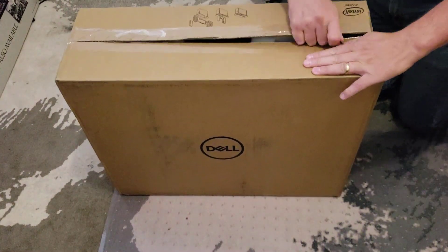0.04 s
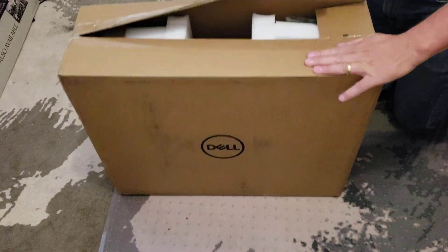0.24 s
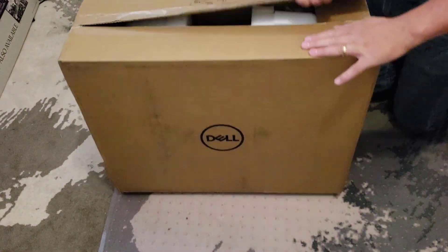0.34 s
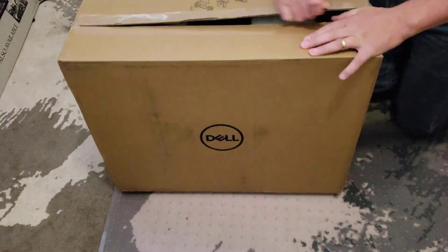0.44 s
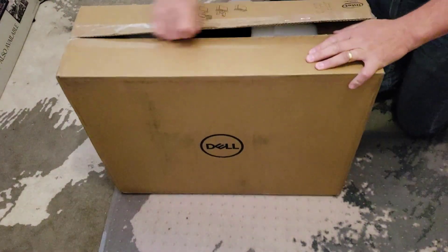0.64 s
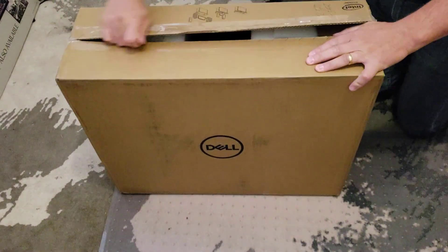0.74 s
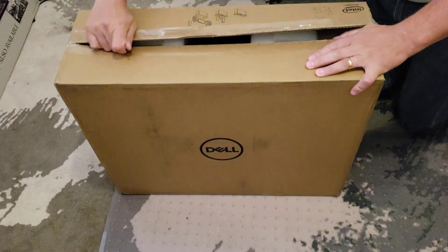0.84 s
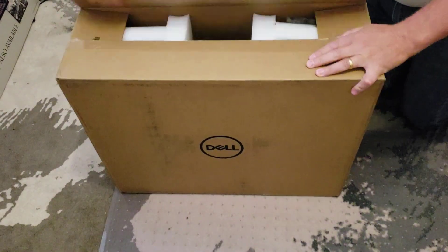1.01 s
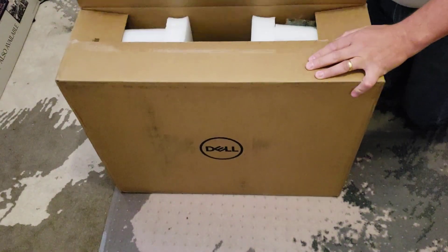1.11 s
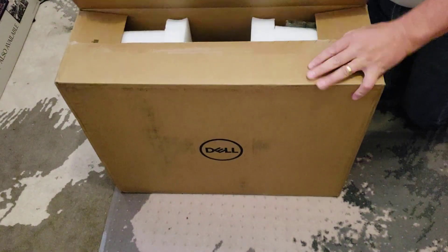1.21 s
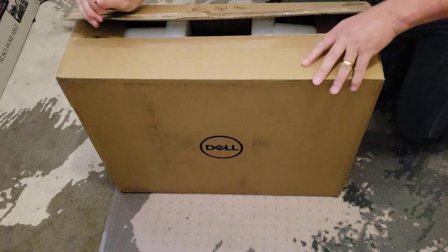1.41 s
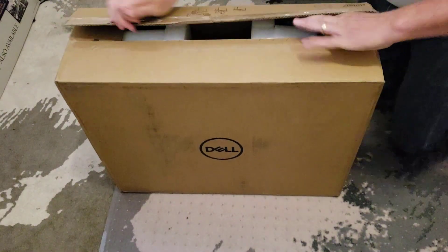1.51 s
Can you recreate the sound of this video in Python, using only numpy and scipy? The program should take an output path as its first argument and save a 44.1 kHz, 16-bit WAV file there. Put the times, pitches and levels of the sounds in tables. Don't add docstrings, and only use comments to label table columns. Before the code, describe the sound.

Tape is tugged off a big hollow cardboard box: faint rubbing and ticks, an early crack with a deep boom, more scuffing, then a second slappier pop and gentle fumbling, close stereo in a small room.

```python
import sys
import numpy as np
from scipy import signal
from scipy.fft import rfft, irfft, next_fast_len
from scipy.io import wavfile
from scipy.ndimage import uniform_filter1d

SR = 44100
rng = np.random.default_rng(int(sys.argv[2]) if len(sys.argv) > 2 else 0)


def bounce(signal):
    frames = np.transpose(np.atleast_2d(signal))
    limited = np.clip(frames, -1, 1)
    pcm = np.round(limited * 32767).astype(np.int16)
    wavfile.write(sys.argv[1], SR, pcm)


def gain_from_decibels(decibels):
    exponent = np.asarray(decibels, float) / 20
    return 10 ** exponent


N = 68355
T = np.arange(N) / SR
SIZE = next_fast_len(2 * N)
F = np.arange(SIZE // 2 + 1) * SR / SIZE + 1


def read(table, hz):
    a = np.array(table, float)
    return np.interp(np.log(hz), np.log(a[:, 0]), a[:, 1], left=a[0, 1], right=a[-1, 1])


def unit(x):
    return x / np.sqrt(np.mean(x ** 2))


def colour(x, table):
    octaves_below = np.maximum(np.log2(table[0][0] / F), 0)
    gain = unit(gain_from_decibels(read(table, F) - 7 * octaves_below))
    return irfft(rfft(x, SIZE) * gain, SIZE)[..., :N]


def ring(x, hz, t60):
    pole = np.exp(2j * np.pi * hz / SR - np.log(1000) / (t60 * SR))
    return signal.lfilter([1], [1, -pole], x)


def walk(rate, size=N):
    k = int(SR / rate)
    steps = np.repeat(rng.standard_normal(size // k + 1), k)
    return unit(uniform_filter1d(steps, k)[:size])


def burst(start, rise, fall, size=N):
    u = np.maximum(T[:size] - start, 0)
    return (1 - np.exp(-u / rise)) * np.exp(-u / fall)


# f/Hz, share common to both
PORT_LIKENESS = [(60, 0.82), (130, 1), (290, 0.88), (640, 0.8), (1410, -0.88), (3100, -0.04), (6820, -1.1),
                 (15000, 0.6)]


def pair(mid, side):
    c = np.clip(read(PORT_LIKENESS, F), 0, 1)
    return np.sqrt((1 + c) / 2) * mid + np.sqrt((1 - c) / 2) * side * np.array([[1], [-1]])


def grit(scatter_db, table):
    sizes = gain_from_decibels(scatter_db * np.minimum(rng.exponential(size=N), 4))
    clicks = unit(rng.standard_normal((2, N)) * sizes)
    ports = irfft(pair(*rfft(clicks, SIZE)), SIZE)[:, :N]
    return colour(ports, table)


# f/Hz, ring t60/s, level/dB pulled at the right end, level/dB at the left end
BOX_TONES = [(74.6, 0.147, -34, -30), (134.7, 0.23, -17, -1), (193.7, 0.27, 2, -10.5),
             (2220, 0.091, -38, -23), (312.8, 0.18, -2, -19), (332.1, 0.2, -2.5, -21),
             (421, 0.17, -31, -16.5), (524, .12, -10, -12), (652.1, 0.18, -11, -23.5),
             (1347, 0.14, -16, -16.5), (794, 0.088, -19, -9.5), (1004, .15, -18.5, -40),
             (1086, 0.13, -19.5, -11), (1544, 0.057, -33, -9)]
# t/s, rise/s, hold/s, hiss level/dB, box level/dB
RUB_STROKES = [(-.05, 0.079, 0.021, -45, -43.5), (-.05, .01, 0.041, -61, -45),
               (0.186, 0.0025, 0.013, -38.5, -39), (0.362, 0.0034, 0.066, -43.5, -49.5),
               (0.468, 0.073, 0.067, -47.5, -47.5), (0.597, 0.044, 0.054, -49, -56.5),
               (0.662, 0.052, 0.033, -47.5, -50.5), (0.772, 0.014, 0.066, -55, -59),
               (0.978, 0.0014, 0.024, -50.5, -53), (0.991, 0.019, 0.011, -37, -40),
               (1.25, 0.0049, 0.053, -56.5, -50), (1.334, 0.035, 0.032, -55.5, -51),
               (1.493, 0.022, 0.035, -48, -41)]
# f/Hz, level/dB per Hz
RUB_HISS = [(530, -15), (900, -30), (1220, -10), (3470, -3.5), (6700, -3), (8870, -11.5), (12900, -3.5),
            (15700, -13), (16500, -45)]
# f/Hz, level/dB per Hz
BOARD_SOUND = [(60, -9.5), (120, -14.5), (300, 1), (700, 0), (1200, -10), (2200, -13.5), (4000, -34)]


def rubbing():
    release_db_s, grain_db, flicker_db = 165, 3.5, 0.5
    hiss_power = box_power = 0
    for s, rise, hold, hiss_db, box_db in RUB_STROKES:
        release = gain_from_decibels(-release_db_s * np.maximum(T - s - rise - hold, 0))
        shape = np.clip((T - s) / rise, 0, 1) ** 2 * release
        hiss_power = hiss_power + (gain_from_decibels(hiss_db) * shape) ** 2
        box_power = box_power + (gain_from_decibels(box_db) * shape) ** 2
    drag = rng.standard_normal(N)
    rings = 0
    for hz, t60, right_db, left_db in BOX_TONES:
        tone = unit(ring(drag, hz, t60 / 2).imag)
        rings = rings + gain_from_decibels(max(right_db, left_db) / 2) * tone
    rumble = grit(grain_db, BOARD_SOUND) + gain_from_decibels(-6.5) * unit(rings)
    hiss = np.sqrt(hiss_power) * gain_from_decibels(flicker_db * walk(60)) * grit(grain_db, RUB_HISS)
    return hiss + np.sqrt(box_power) * gain_from_decibels(flicker_db * walk(48)) * rumble


# f/Hz, level/dB per Hz
HUSH_SOUND = [(30, 2), (150, -13), (800, -23), (1500, -4), (3500, -13.5), (8000, -2), (9000, -8),
              (16000, -26)]


def hush():
    return gain_from_decibels(-64) * grit(0, HUSH_SOUND)


def boom(start, rise, fall, place, tilt_db, ring_share):
    ring_samples = SR // 2
    turn_per_octave, wobble_size_db = 0.25, 2
    out = np.zeros((2, N + ring_samples))
    first = int(max(start, 0) * SR)
    for k, (hz, t60, right_db, left_db) in enumerate(BOX_TONES):
        swell = burst(0, rise + 0.51 / hz, fall, size=ring_samples)
        push = rng.standard_normal(ring_samples) * swell
        z = ring(push, hz, t60 * ring_share)
        octave = max(np.log2(hz / BOX_TONES[1][0]), 0)
        wobble_db = wobble_size_db * min(octave + 0.5, 2) * walk(45.4, size=ring_samples)
        db = right_db + place * (left_db - right_db) + tilt_db * octave + wobble_db
        angle = (-1) ** k * (turn_per_octave * octave + 0.12) * np.array([[0.5], [-0.5]])
        tone = (z * np.exp(1j * angle)).imag / np.abs(z).max()
        out[:, first:first + ring_samples] += gain_from_decibels(db) * tone
    return out[:, :N]


# t/s, level/dB, place (0 right - 1 left), push time/s
SOFT_NUDGES = [(0, -32, 0.21, 0.0034), (0.029, -36, 0.31, 0.018), (0.391, -38.5, 1, 0.019),
               (.51, -35.5, 0.85, 0.024), (.545, -35.5, 0.37, 0.011), (0.574, -37.5, .1, 0.0079),
               (0.699, -40, 1, 0.011), (.95, -48.5, 0.37, 0.013), (1.012, -28, 0.85, 0.029),
               (1.285, -44, 0.44, 0.0031), (1.378, -34, 0.16, 0.006), (1.396, -32.5, 0.92, 0.0095),
               (1.421, -43, 0.87, 0.023)]


def nudges():
    tilt_db, held_share = -4.5, 0.63
    out = 0
    for s, db, place, push in SOFT_NUDGES:
        out = out + gain_from_decibels(db) * boom(s, push, push, np.clip(place, 0, 1), tilt_db, held_share)
    return out


# f/Hz, t60/s, level/dB
ROOM_ECHOES = [(100.6, 0.35, -10), (304, 0.36, -5.5), (775, 0.44, -2.5), (1380, 0.48, -5.5),
               (2460, 0.49, -3.5), (6000, 0.36, -2.5), (14100, 0.16, -6)]


def room(x):
    delay_s = 0.0047
    noise = pair(*rfft(rng.standard_normal((2, N)), SIZE))
    levels = np.array(ROOM_ECHOES)[:, ::2]
    tail = 0
    for hz in 40 * 2 ** (np.arange(18) / 2):
        band = np.clip(1 - 2 * np.abs(np.log2(F / hz)), 0, 1) * gain_from_decibels(read(levels, hz))
        fall = read(ROOM_ECHOES, hz) / np.log(1000)
        fade = burst(delay_s, 0.002, fall) / np.sqrt(fall * SR / 2)
        tail = tail + irfft(noise * band, SIZE)[:, :N] * fade
    return irfft(rfft(tail, SIZE) * rfft(x, SIZE), SIZE)[:, :N]


# t/s, peak level/dB, f/Hz, t60/s
TAPE_TICKS = [(0.0152, -30.5, 1630, 0.0083), (.027, -30, 1530, 0.005), (0.025, -41, 5140, 0.012),
              (.191, -24.5, 11300, 0.001), (0.373, -34.5, 11200, 0.0017), (0.467, -35, 6000, 0.0022),
              (.9842, -33.5, 6000, 0.0021), (1.0005, -23, 5370, 0.0018), (1.275, -42.5, 1570, 0.011),
              (1.3763, -41, 7070, .01), (1.416, -43, 5340, 0.0052), (1.5165, -41, 1968, 0.034)]


def ticks():
    out = 0
    for s, db, hz, t60 in TAPE_TICKS:
        snap = np.gradient(rng.standard_normal(N) * burst(s, 0.00016, 0.0017))
        z = ring(ring(snap, hz, t60 / 2), hz, t60).imag
        out = out + gain_from_decibels(db) * z / np.abs(z).max()
    return out


# t/s, boom level/dB, slap level/dB, crack level/dB, shudder time/s
TAPE_POPS = [
    (.2325, -9.5, -13.5, -22.5, 0.023),
    (1.0605, -14, -11.5, -24.5, .025),
]
# f/Hz, level/dB per Hz
CRACK_SOUND = [(880, -15), (1500, -27), (3260, -1), (3640, -2), (7910, -3), (8920, -17), (14900, -8),
               (15800, -39), (16700, -69)]
# f/Hz, level/dB per Hz
KNOCK_SOUND = [(600, -16), (1000, 5.5), (1700, 0), (2300, -10), (4000, -20)]


def pops():
    slap_rise_s = 0.006
    out = 0
    for place, (s, boom_db, slap_db, crack_db, shudder) in enumerate(TAPE_POPS):
        out = out + gain_from_decibels(boom_db) * boom(s, 0.00059, shudder * 0.47, place, 0, 1)
        slap = grit(2.05, BOARD_SOUND) * burst(s, slap_rise_s, shudder)
        out = out + gain_from_decibels(slap_db + 3.3 * walk(150)) * slap
        out = out + gain_from_decibels(slap_db - 1) * grit(2.2, KNOCK_SOUND) * burst(s, 0.0011, 0.0052)
        snap = burst(s, 0.00071, 0.0046)
        tail = gain_from_decibels(-2.5) * burst(s, slap_rise_s, 0.03)
        out = out + gain_from_decibels(crack_db) * grit(1.6, CRACK_SOUND) * (snap + tail)
    return out


def scene():
    port_lag_s, pan_db = 0.00012, 0.25
    x = rubbing() + nudges() + ticks() + pops()
    turn = np.exp(-1j * np.pi * F * port_lag_s * np.array([[1], [-1]]))
    direct = irfft(rfft(x, SIZE) * turn, SIZE)[:, :N]
    direct = direct * gain_from_decibels(np.array([[pan_db], [-pan_db]]) / 2)
    return direct + room(x) + hush()


def band_limit(x):
    return signal.sosfilt(signal.butter(12, 16810, fs=SR, output="sos"), x)


def record(dry):
    low_cut_hz, top_hz = 84, 15900
    thin = signal.sosfilt(signal.butter(2, low_cut_hz, "high", fs=SR, output="sos"), dry)
    mix = signal.sosfilt(signal.ellip(8, 0.2, 60, top_hz, fs=SR, output="sos"), thin)
    return band_limit(mix)


dry = scene()
out = record(dry)
bounce(out)
```